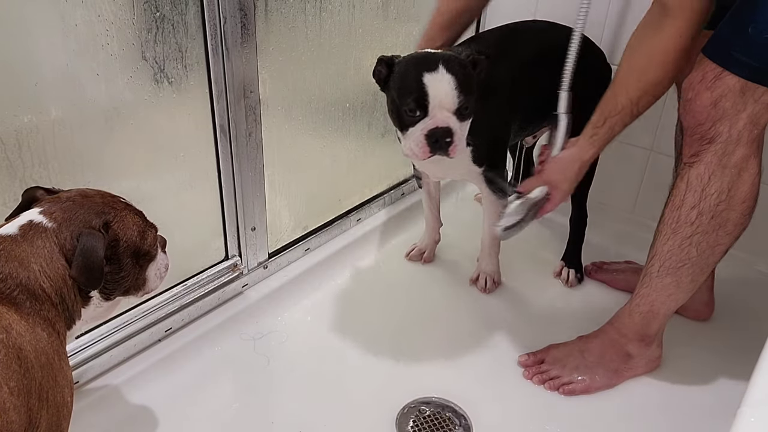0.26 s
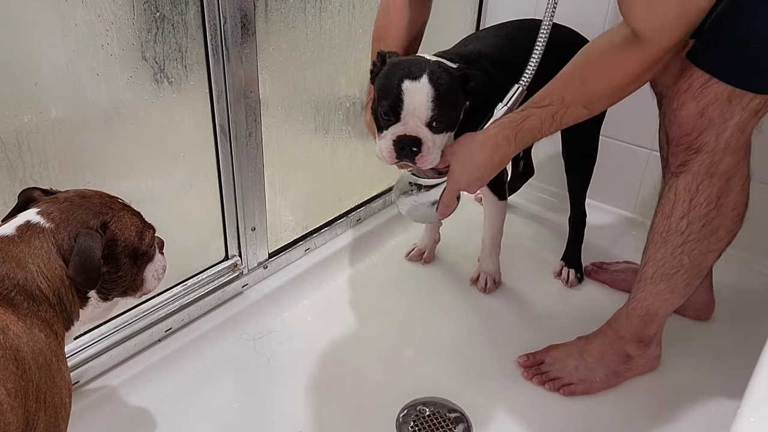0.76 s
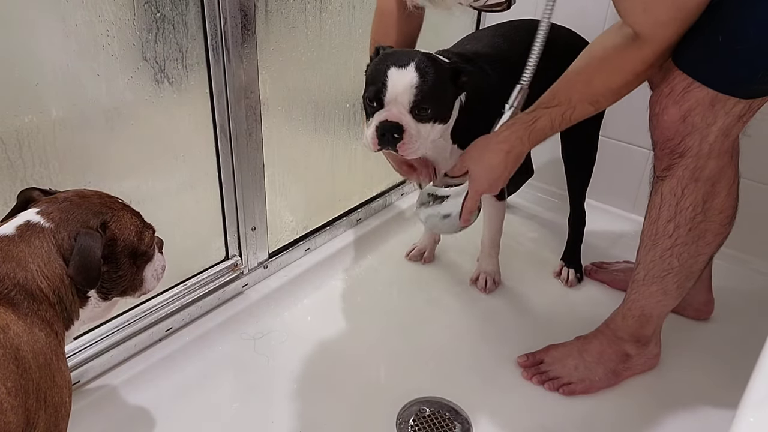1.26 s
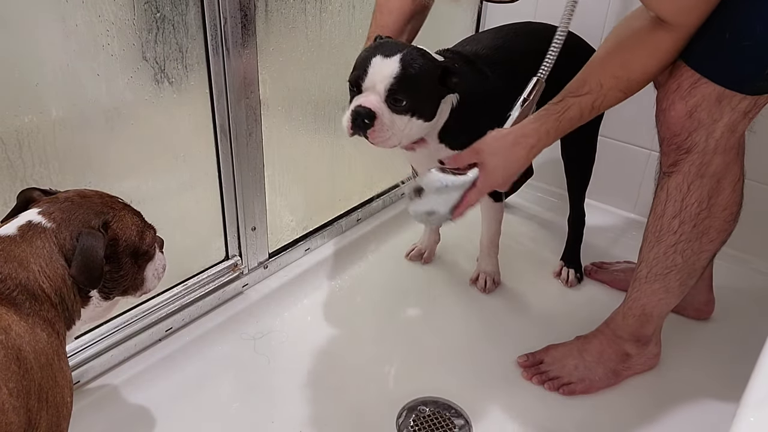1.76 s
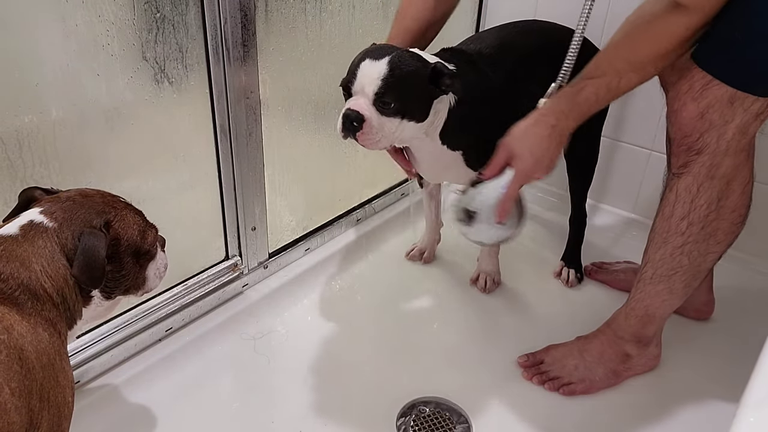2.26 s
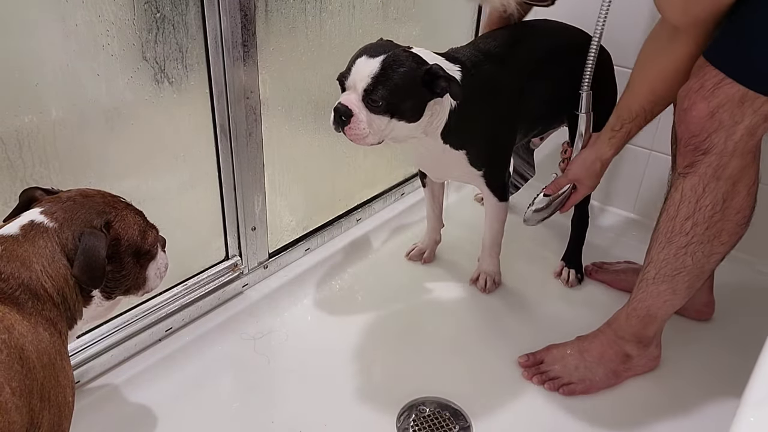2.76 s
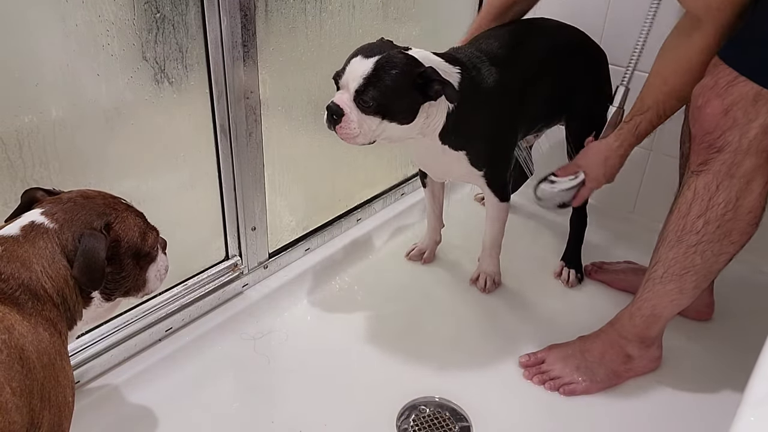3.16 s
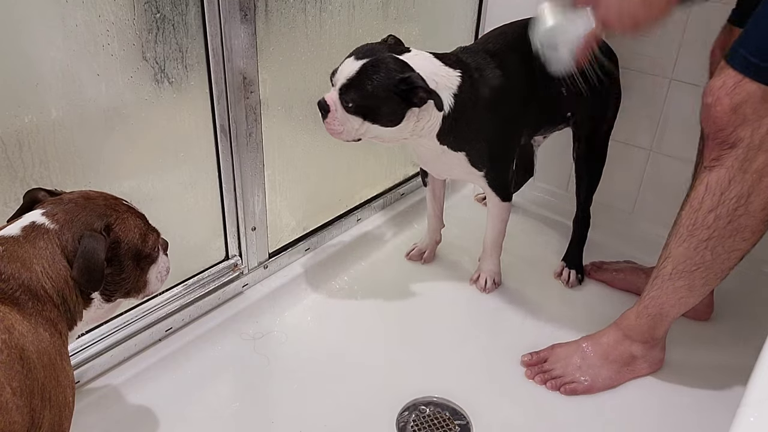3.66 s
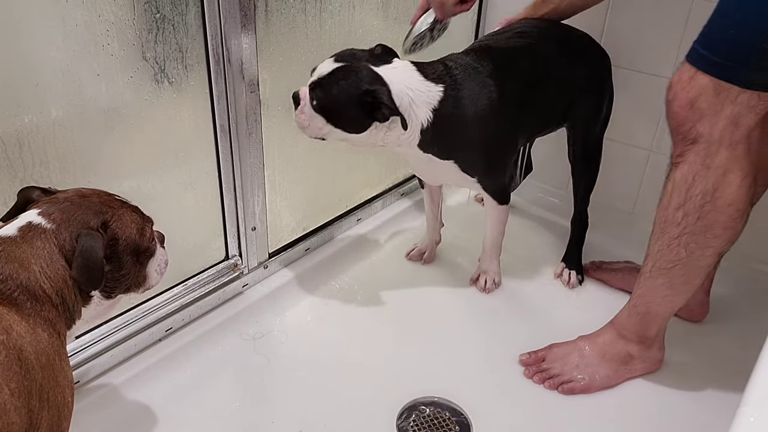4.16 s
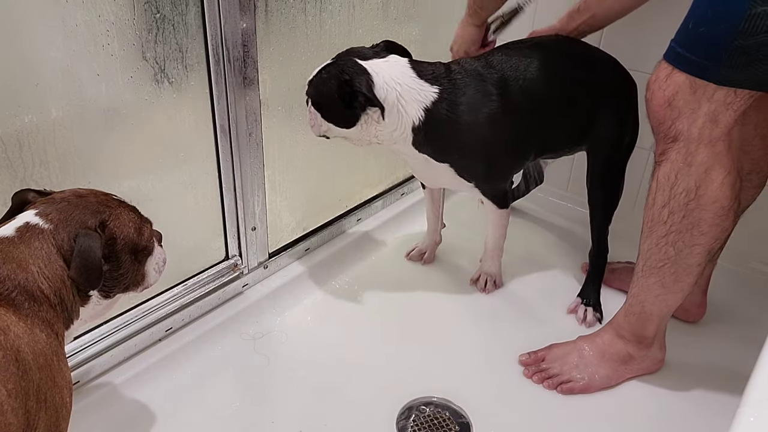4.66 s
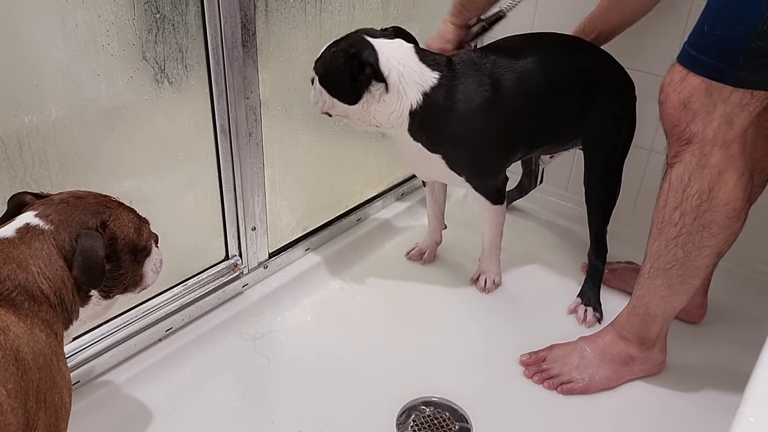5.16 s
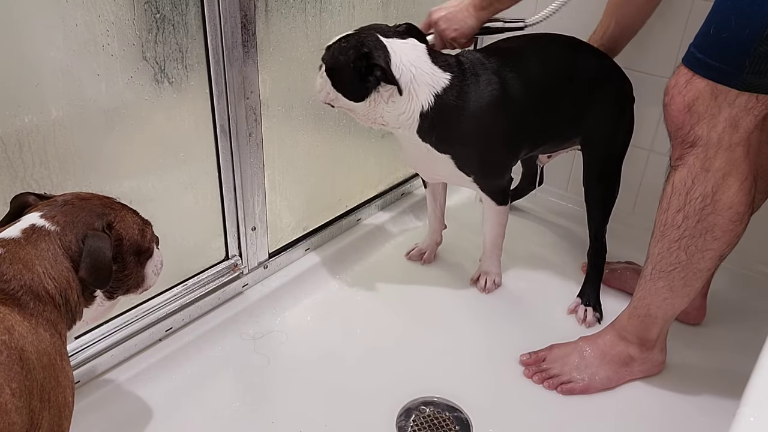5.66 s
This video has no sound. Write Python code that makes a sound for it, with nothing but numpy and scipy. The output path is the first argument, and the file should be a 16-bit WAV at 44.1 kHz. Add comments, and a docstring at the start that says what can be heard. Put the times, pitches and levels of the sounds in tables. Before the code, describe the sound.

Close shower spray hisses steadily, splashing on wet fur and drumming on the stall floor; a few thuds, then a sharp, rattling knock.

```python
"""Spray from a handheld shower head rinses a dog, heard close up on a stereo microphone in a small stall.
Fine droplets hiss, and the jet splashes on the coat with a pitch that follows its angle.
Behind it, stray jets tap the walls and graze the glass, fat drops tick and run-off drums on the pan.
The hose thuds against the wall as the shower head is lifted; later a hard bump shakes the stall
and rattles the glass door in its frame."""
import sys
import numpy as np
from scipy import signal
from scipy.fft import rfft, irfft, next_fast_len
from scipy.io import wavfile

SR = 44100
rng = np.random.default_rng(int(sys.argv[2]) if len(sys.argv) > 2 else 0)


def materialize(psi):
    """Save the field psi as 16-bit PCM at rate SR to the path in sys.argv[1].

    A 1-D psi becomes a single channel; in a 2-D psi each row is a channel.
    """
    bounded = np.clip(np.atleast_2d(psi).T, -1, 1)
    quanta = np.round(bounded * 32767).astype(np.int16)
    wavfile.write(sys.argv[1], SR, quanta)


N = 261292


def from_db(db):
    """Decibels to gain."""
    return 10 ** (np.asarray(db) / 20)


def rms_one(x):
    """Scale to rms 1."""
    return x / np.sqrt(np.mean(x ** 2) + 1e-20)


def level_curve(rows):
    """Gain at every sample, from rows of time_s, level_db."""
    time_s, level_db = np.transpose(rows)
    return from_db(np.interp(np.arange(N) / SR, time_s, level_db))


def drift(rate_hz):
    """Slow random wander with spread 1."""
    hop, settle = 40, 2000
    pole = np.exp(-2 * np.pi * rate_hz * hop / SR)
    noise = rng.standard_normal(N // hop + settle + 2)
    slow = signal.lfilter([1], [1, -2 * pole, pole * pole], noise)[settle:]
    return np.interp(np.arange(N) / hop, np.arange(len(slow)), rms_one(slow))


def colour(x, spectrum):
    """Shape a sound by rows of freq_hz, gain_db."""
    hz, gain_db = np.transpose(spectrum)
    size = next_fast_len(N)
    log_hz = np.log(np.arange(size // 2 + 1) * SR / size + 1)
    gain = from_db(np.interp(log_hz, np.log(hz), gain_db))
    return irfft(rfft(x, size) * gain, size)[..., :N]


def filtered(x, hz, kind):
    """Second-order Butterworth filter."""
    sos = signal.butter(2, np.clip(hz, 10, .47 * SR), kind, fs=SR, output="sos")
    return signal.sosfilt(sos, x + 1e-18)


def ring(force, hz, t60_s):
    """One mode: a unit click sets a decaying sine ringing."""
    decay, step = from_db(-60 / (t60_s * SR)), 2 * np.pi * hz / SR
    return signal.lfilter([0, np.sin(step)], [1, -2 * decay * np.cos(step), decay ** 2], force + 1e-18)


def resonances(x, peaks):
    """What a set of narrow resonances gives back."""
    return sum(from_db(gain_db) * signal.lfilter(*signal.iirpeak(hz, hz / width_hz, fs=SR), x)
               for hz, width_hz, gain_db in peaks)


def add(track, start_s, sound):
    """Mix a short sound in at start_s."""
    at = int(start_s * SR)
    track[at:at + len(sound)] += sound[:N - at]


def burst(t60_s, band_hz=None, size=4096):
    """A contact: noise that dies at once, with energy 1."""
    noise = rng.standard_normal(size) * from_db(-60 * np.arange(size) / SR / t60_s)
    if band_hz:
        noise = filtered(noise, band_hz, "band")
    return noise / np.linalg.norm(noise)


def push(level_db, brightness_hz):
    """The force pulse of a blow: the softer the contact, the duller."""
    return from_db(level_db) * filtered(signal.unit_impulse(SR // 10), brightness_hz, "low")


def swells(rows, attack_s, release_s, rest_db, arch_db=0):
    """Gain of a flow that rests low; in each event it rises, holds (ends arch_db down) and dies away."""
    t, power = np.arange(N) / SR, from_db(rest_db) ** 2
    for start_s, length_s, level_db, *_ in rows:
        age = t - start_s
        rise = np.clip(age / attack_s + .5, 0, 1)
        fall = np.exp(-np.maximum(age - length_s, 0) / release_s)
        arch = from_db(-arch_db * (2 * np.clip(age / length_s, 0, 1) - 1) ** 2)
        power = power + (from_db(level_db) * rise * arch * fall) ** 2
    return np.sqrt(power)


def stall(x, direct_db, low_t60_s=0.33, high_t60_s=0.26):
    """Direct sound plus dense reflections off hard, near walls, different in each channel."""
    t = np.arange(SR // 2) / SR
    walls = rng.standard_normal((2, len(t))) * (t > .002)
    echo = filtered(walls, 5850, "low") * from_db(-60 * t / low_t60_s)
    echo += filtered(walls, 6750, "high") * from_db(-60 * t / high_t60_s)
    echo /= np.linalg.norm(echo, axis=1, keepdims=True)
    echo[[0, 1], [0, 7]] += from_db(direct_db)  # reaches the right channel 7 samples later
    return signal.fftconvolve(x[None], echo, axes=1)[:, :N] / np.sqrt(1 + from_db(direct_db) ** 2)


def impacts(per_s, spread_db):
    """Droplets land at random, most small and a few large."""
    sizes = from_db(spread_db * np.minimum(rng.exponential(1, N), 5))
    signs = rng.choice([-1, 1], N)
    return rms_one(sizes * signs * (rng.random(N) < per_s / SR))


def shower(per_s, spread_db, direct_db, fade_s=0.03):
    """Droplets tick all around the microphone, their echoes blurred into a wash that follows them."""
    ticks = np.array([impacts(per_s, spread_db) for channel in range(2)])
    decay = np.exp(-1 / (fade_s * SR))
    echo_power = signal.lfilter([1 - decay], [1, -decay], np.mean(ticks ** 2, axis=0), zi=[1.])[0]
    wash = np.sqrt(echo_power) * rng.standard_normal((2, N))
    return rms_one(from_db(direct_db) * ticks + wash)


# spectrum of drops on the walls: freq_hz, gain_db
PATTER_SPECTRUM = [(300, -13), (460, -9.5), (565, -1.5), (630, -1.5), (760, 5), (880, -7), (970, -1),
                   (1150, -4), (1600, -1.5), (2200, -13.5), (5000, -37)]
# wall resonances, excited by patter and splash: pitch_hz, width_hz, gain_db
WALL_PEAKS = [(564, 14, 4), (982, 13, -2), (1797, 13, 9), (2385, 20, 0), (2920, 15, -7), (3140, 31, -19),
              (3520, 23, -4)]
# rise and fall of the patter: time_s, level_db
PATTER_LEVEL = [(0, -56.5), (.45, -51), (.9, -58), (2.85, -54.5), (3.2, -60), (4.14, -58.5), (4.3, -51.5),
                (4.52, -51), (4.75, -58.5), (5.92, -53)]
def wall_patter():
    """In the background, stray jets tap the thin wall panels."""
    taps = colour(shower(per_s=1200, spread_db=3.0, direct_db=-0.5), PATTER_SPECTRUM)
    return level_curve(PATTER_LEVEL) * rms_one(taps + resonances(taps, WALL_PEAKS))


# resonances of the glass panel: pitch_hz, width_hz, gain_db
GLASS_PEAKS = [(566, 7, 1), (968, 53, -16), (1137, 90, -10), (1467, 55, -7.5)]
# the jet grazes the glass: start_s, length_s, level_db
GRAZES = [(.39, 0.078, -46.5), (.57, .11, -45.5), (.78, .05, -54), (.98, .06, -51.5)]
def glass_hum():
    """Where the jet misses the dog and grazes the glass, the panel hums."""
    drops = shower(per_s=800, spread_db=3.0, direct_db=1.5)
    hum = rms_one(filtered(resonances(drops, GLASS_PEAKS), [450, 2200], "band"))
    return swells(GRAZES, attack_s=0.035, release_s=0.063, rest_db=-73.5) * hum


# spectrum of water on the moulded pan: freq_hz, gain_db
PAN_SPECTRUM = [(20, 0), (36, -8), (54, -6), (90, -4), (130, -2.5), (185, -2.5), (240, -1), (290, 0.5),
                (325, -10.5), (380, -7.5), (440, -19), (900, -25)]
# resonances of the pan: pitch_hz, width_hz, gain_db
PAN_PEAKS = [(39.3, 8, 4.5), (69.3, 9.6, 3), (126.7, 11, -1.5), (142.4, 14, -0.5), (210, 11, 4.5),
             (240, 5.2, -10), (271.8, 11.2, 1), (368, 12.6, -2)]
# heavier gushes off the dog's back: start_s, length_s, level_db
GUSHES = [(3.7, 0.3, -50), (4.36, 0.25, -46), (5.42, 0.089, -47), (5.8, 0.097, -50.5)]
def pan_drumming():
    """Run-off drums steadily on the hollow pan underfoot; the deep part reaches both channels alike."""
    drops = colour(shower(per_s=2500, spread_db=2.5, direct_db=3.5), PAN_SPECTRUM)
    mid, side = drops + resonances(drops, PAN_PEAKS)
    side = from_db(-8.5) * rms_one(filtered(side, 600, "high"))
    drumming = rms_one(mid) + np.array([side, -side])
    return swells(GUSHES, attack_s=0.027, release_s=0.1, rest_db=-50) * drumming


# single fat drops: start_s, level_db, pitch_hz
DROPS = [(.759, -8, 12200), (1.074, -4.5, 2430), (1.954, -13, 11500), (2.294, -8, 9350),
         (2.416, -6.5, 9400), (3.1, -12, 11000), (4.265, -10, 9900), (4.8, -14.5, 12500),
         (5.63, -13, 11900)]
def fat_drops():
    """Large drops tick on a hard surface near the microphone."""
    ticks = np.zeros(N)
    for start_s, level_db, hz in DROPS:
        add(ticks, start_s, from_db(level_db - 0.5) * burst(t60_s=0.012, band_hz=[hz / 1.17, hz * 1.17]))
    return stall(ticks, direct_db=-2)


# blows on the stall: start_s, push_db, brightness_hz, slap_db, slap_pitch_hz
BLOWS = [(1.075, -39, 217, -33, 900), (3.6395, -38.5, 500, -8.5, 1210), (3.646, -43, 400, -14, 3240),
         (3.651, -28, 336, -10, 960), (3.686, -37.5, 250, -17, 740), (3.847, -35, 400, -18.5, 1640),
         (3.862, -30.5, 355, -13.5, 640), (3.925, -42.5, 297, -24, 600), (4.018, -33, 212, -29, 453),
         (4.04, -34, 223, -24, 398), (4.345, -37.5, 260, -33, 600), (4.55, -47, 260, -21, 600),
         (4.61, -36, 262, -26, 503), (5.352, -22, 70, -32, 400), (5.367, -17, 109, -5, 467),
         (5.55, -26.5, 105, -20.5, 406)]
# modes of the stall's shell: pitch_hz, gain_db, t60_s
SHELL_MODES = [(39.2, -1.5, 0.32), (69.6, -6.5, 0.41), (92.7, -3.5, 0.37), (138.4, -2, 0.27),
               (209.3, -3, 0.46), (223.2, 4.5, 0.26), (250, -3.5, 0.49), (278, 2.5, 0.39),
               (307.6, -5.5, 0.54), (401, -10, 0.48), (617, -17, 0.33)]
def stall_thuds():
    """Each blow slaps the surface of the shell around the microphone and pushes it into its modes."""
    force, slaps = np.zeros(N), np.zeros(N)
    for start_s, push_db, brightness_hz, slap_db, slap_hz in BLOWS:
        add(force, start_s, push(push_db, brightness_hz))
        slap = burst(t60_s=0.031, band_hz=[slap_hz / 1.56, slap_hz * 1.26])
        add(slaps, start_s, from_db(slap_db) * slap)
    shell = sum(from_db(gain_db - 8) * ring(force, hz, t60_s) for hz, gain_db, t60_s in SHELL_MODES)
    return shell + stall(slaps, direct_db=-10)


# the dull, heavy bump on the door: start_s, level_db, brightness_hz
BUMP = (5.369, -6, 107)
# the door chatters in its frame: start_s, level_db
RATTLE = [(5.361, -41), (5.3665, -24), (5.371, -23.5), (5.377, -31), (5.39, -38), (5.407, -34),
          (5.443, -41)]
# spectrum of glass striking the frame: freq_hz, gain_db
CRACK_SPECTRUM = [(900, -14.5), (1350, -12.5), (1600, 1.5), (2400, -2.5), (3300, 2), (3900, -12),
                  (6000, -7.5), (10000, -13), (15000, -34)]
# modes of the door: pitch_hz, gain_db, t60_s
DOOR_MODES = [(73.4, -11, 0.39), (124.2, 9, 0.17), (196, -10.5, 0.38), (409, -4, 0.28), (493, 0.5, 0.29),
              (530, -2, 0.54), (595, -13, 0.69), (1026, -9, 0.31), (1528, 1, 0.11), (1660, -17, 0.21),
              (1920, -16, 0.16), (1950, -1, 0.13), (2000, -0.5, 0.089), (2260, -12, 0.12), (2347, 5, 0.14),
              (2470, -16, 0.2), (2720, -11, 0.22), (2840, -4, 0.1), (2810, 0, 0.089), (3600, -10, 0.12),
              (3400, -20, 0.16), (3575, -16, .22)]
def door_rattle():
    """The bump flexes the glass door, which cracks against its metal frame a few times and rings."""
    force, contacts = np.zeros(N), np.zeros(N)
    bump_s, bump_db, brightness_hz = BUMP
    add(force, bump_s, push(bump_db, brightness_hz))
    for start_s, level_db in RATTLE:
        add(force, start_s, from_db([level_db]))
        add(contacts, start_s, from_db(level_db) * burst(t60_s=0.023))
    door = stall(from_db(36) * colour(contacts, CRACK_SPECTRUM), direct_db=-14)
    for k, (hz, gain_db, t60_s) in enumerate(DOOR_MODES):
        mode = from_db(gain_db - 9) * ring(force, hz, t60_s)
        # short waves reach the two channels up to a quarter cycle apart
        lag = (-1) ** k * int(SR / hz / 4 * min(1, (hz / 450) ** 2))
        door += np.array([mode, from_db(-1) * np.roll(mode, lag)])
    return door


# the jet sweeps over the coat: start_s, length_s, level_db, first_pitch_hz, last_pitch_hz
SWEEPS = [(0.1, 0.26, -45, 4900, 4220), (.37, 0.16, -43.5, 3580, 2850), (0.576, .18, -42, 1510, 2720),
          (0.93, 0.11, -40.5, 2700, 2620), (1.04, 0.05, -40, 2900, 3340), (1.284, 0.2, -43, 3130, 2550),
          (1.488, 0.3, -48.5, 2450, 2480), (1.826, .18, -42.5, 3140, 2380), (2.19, 0.22, -55.5, 3300, 3100),
          (3.217, 0.36, -50.5, 3750, 3600), (4.038, 0.19, -43.5, 3930, 2980), (4.238, .2, -44, 2850, 2370),
          (5.188, 0.63, -49.5, 3100, 3030)]
def coat_splash(width_octaves=0.31, skirt=0.74, flutter_db=1.0):
    """The jet on wet fur, close by: coarse, uneven drops, strongest in a band that glides with the aim."""
    drops = shower(per_s=1300, spread_db=3.3, direct_db=-1)
    hz, time_s, spectra = signal.stft(drops, SR, nperseg=512)
    widths_away = np.log2((hz[:, None] + 1) / splash_pitch(time_s)) / width_octaves
    band = (1 + widths_away ** 2 / 2) ** -skirt
    wet = signal.istft(spectra * band / np.linalg.norm(band, axis=0), SR)[1][:, :N]
    wet = (wet + resonances(wet, WALL_PEAKS)) * from_db(flutter_db * drift(rate_hz=19))
    return swells(SWEEPS, attack_s=0.094, release_s=0.15, rest_db=-64, arch_db=2) * rms_one(wet)


def splash_pitch(time_s):
    """The pitch follows the jet's angle, gliding through each sweep and on to the start of the next."""
    corners = []
    for start_s, length_s, _, first_hz, last_hz in SWEEPS:
        corners += [(start_s, first_hz), (start_s + length_s, last_hz)]
    corner_s, hz = np.transpose(corners)
    return np.exp(np.interp(time_s, corner_s, np.log(hz)))


# spectrum of the fine mist: freq_hz, gain_db
MIST_SPECTRUM = [(400, -7.5), (1000, -5.5), (2000, -8), (3000, 0.5), (4000, -1.5), (5000, -1), (7000, -2.5),
                 (8200, -2), (9300, 3.5), (10700, 1), (12000, 1.5), (14000, -0.5), (15500, -3)]
# rise and fall of the mist: time_s, relative_level_db
MIST_LEVEL = [(0.0, -44), (0.1, -43.5), (0.93, -50), (1.09, -42), (1.23, -47), (1.75, -48), (1.97, -46.0),
              (2.14, -48), (2.46, -44.0), (2.61, -49), (2.94, -45.5), (2.99, -50), (3.48, -46),
              (3.55, -49.5), (3.74, -51), (4.37, -45.5), (4.76, -50.5), (4.81, -49), (4.93, -48),
              (5.52, -47), (5.74, -48), (5.92, -47.0)]
def spray_mist(gain_db=4.5, flutter_db=1.4):
    """Fine jets break into thousands of droplets: a bright, gritty hiss all around the microphone."""
    drops = shower(per_s=5000, spread_db=4.5, direct_db=-5.5)
    drops *= from_db(flutter_db * drift(rate_hz=7.6))
    return from_db(gain_db) * level_curve(MIST_LEVEL) * rms_one(colour(drops, MIST_SPECTRUM))


def scene():
    """Water and bumps from inside the stall, a little left of centre."""
    leftward = np.array([[1], [-1]])
    around = spray_mist() + fat_drops() + pan_drumming()
    ahead = coat_splash() + wall_patter() + glass_hum() + stall_thuds() + door_rattle()
    return around * from_db(0.34 * leftward) + ahead * from_db(0.93 * leftward)


def record(dry):
    """The microphone drops the deepest rumble; the top is cut steeply."""
    low_cut_hz, high_cut_hz = 29, 15650
    top = signal.firwin(301, high_cut_hz, fs=SR)
    return signal.fftconvolve(filtered(dry, low_cut_hz, "high"), top[None], mode="same", axes=1)


dry = scene()
out = record(dry)
materialize(out)
```